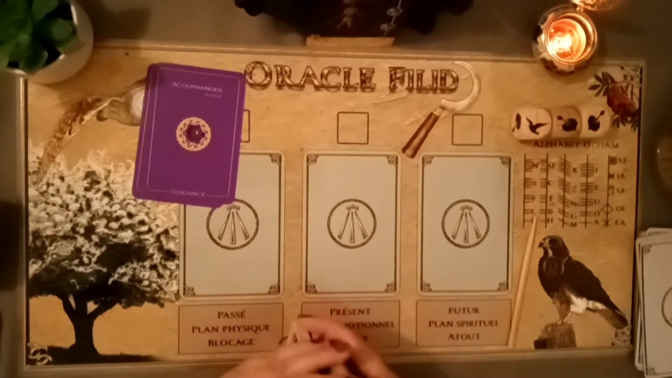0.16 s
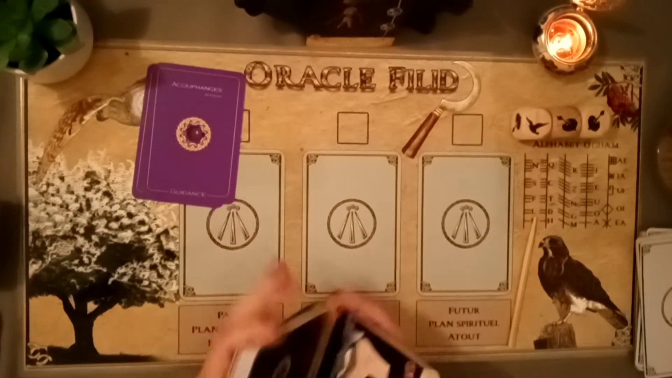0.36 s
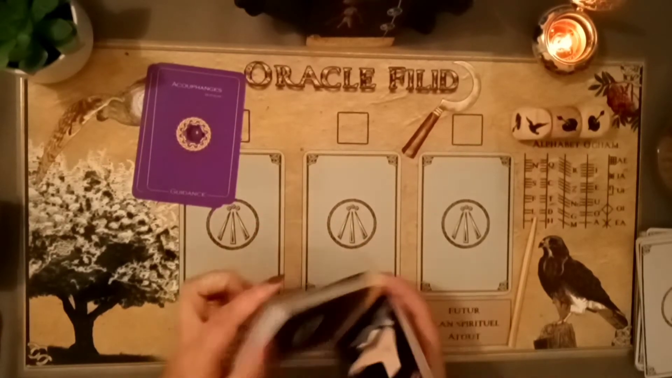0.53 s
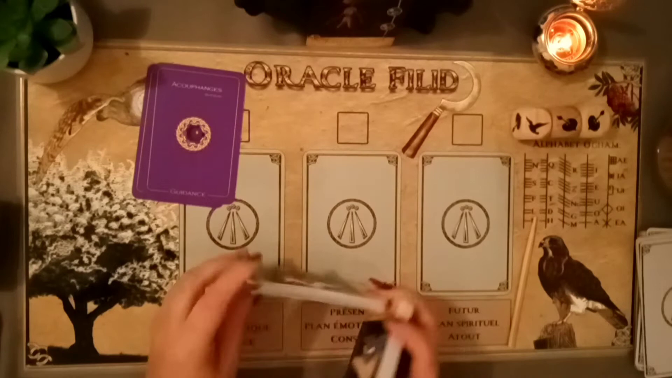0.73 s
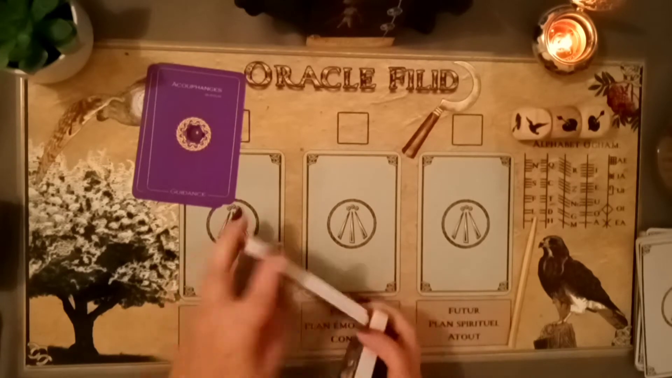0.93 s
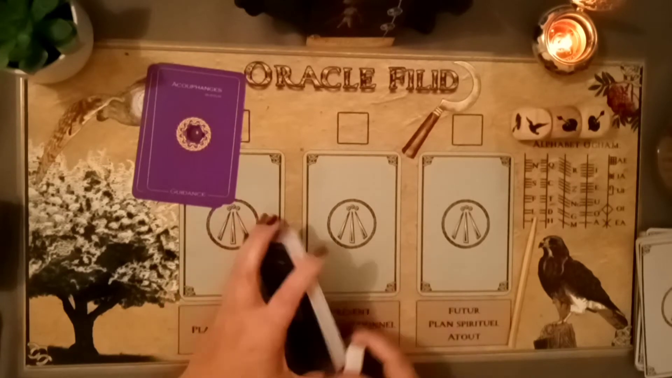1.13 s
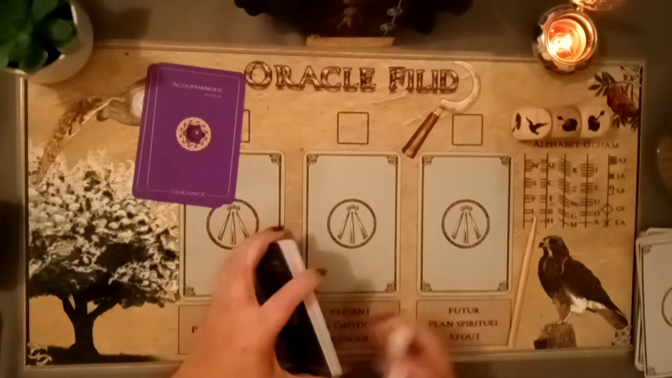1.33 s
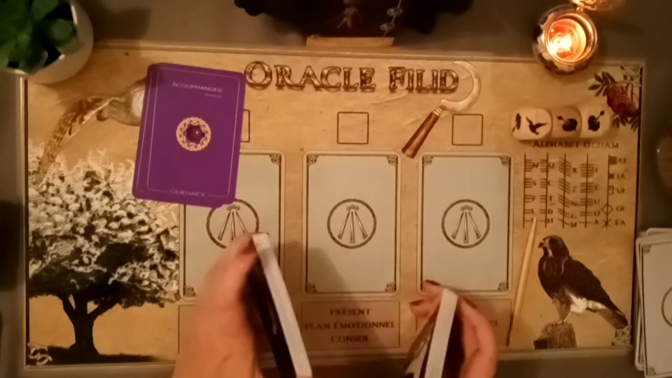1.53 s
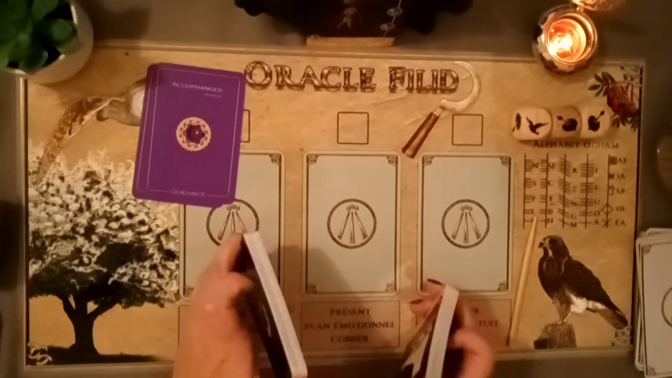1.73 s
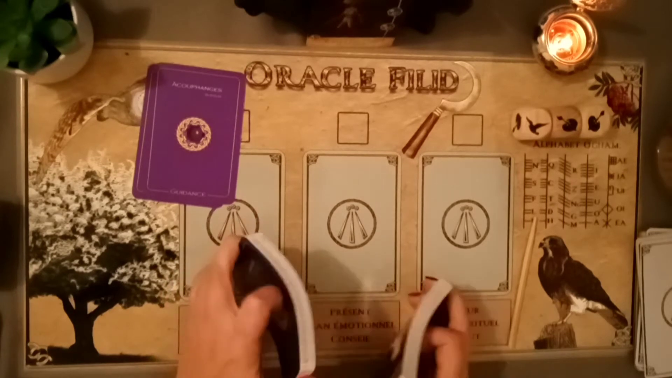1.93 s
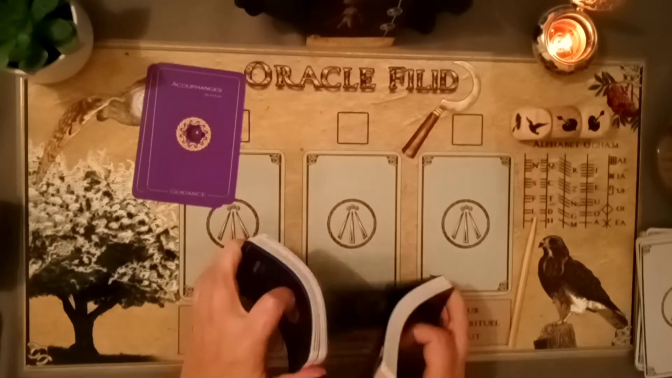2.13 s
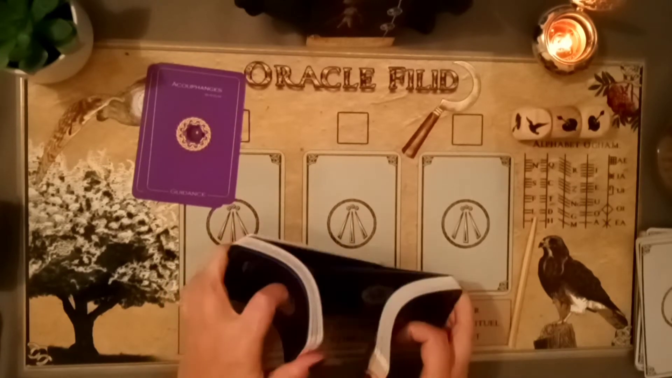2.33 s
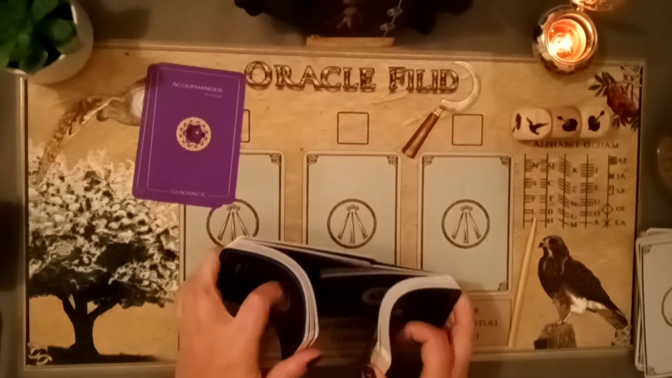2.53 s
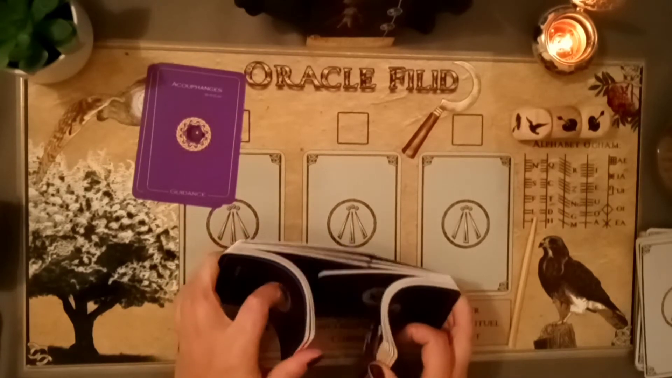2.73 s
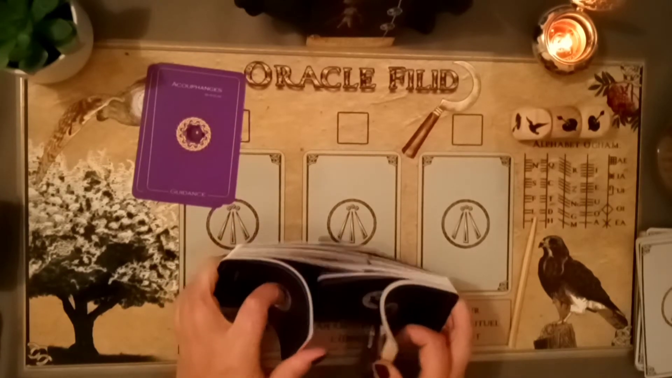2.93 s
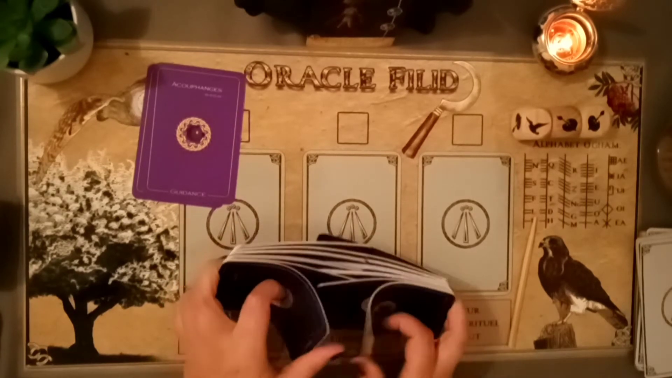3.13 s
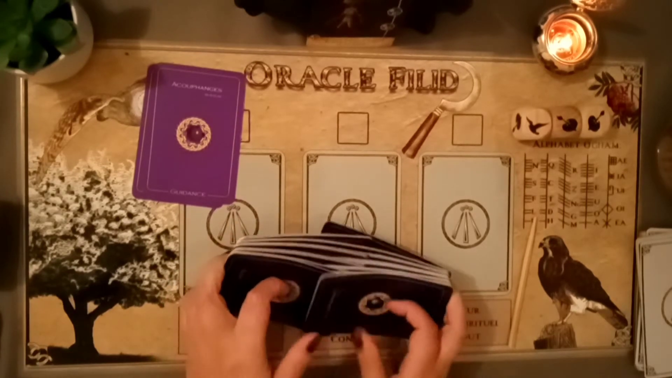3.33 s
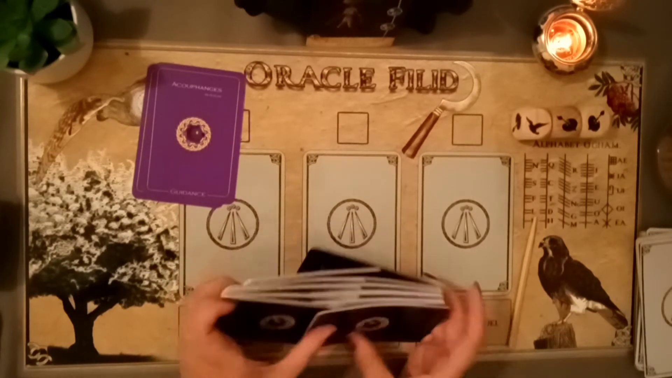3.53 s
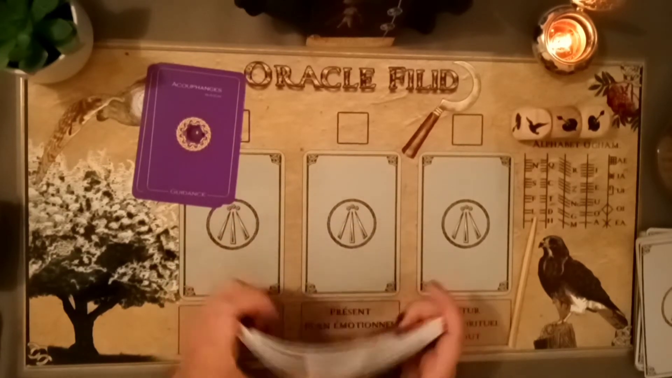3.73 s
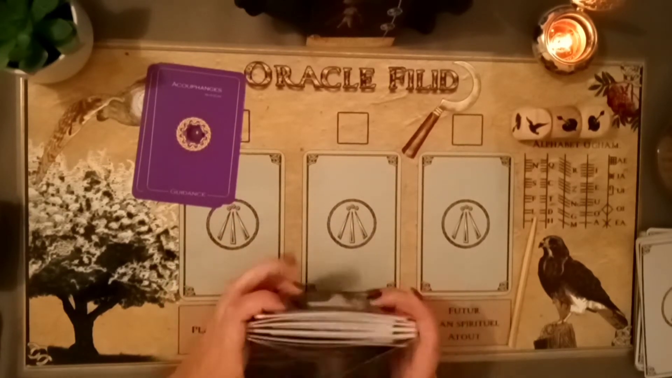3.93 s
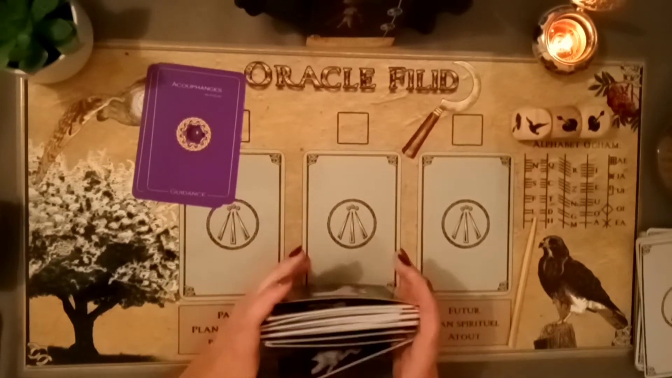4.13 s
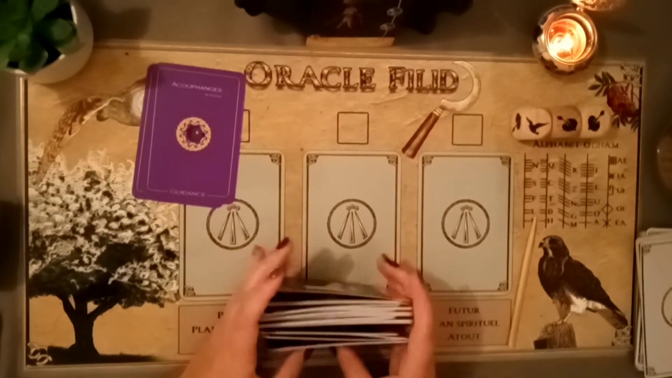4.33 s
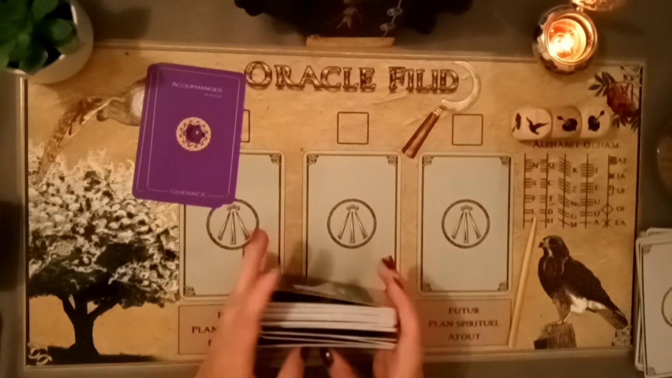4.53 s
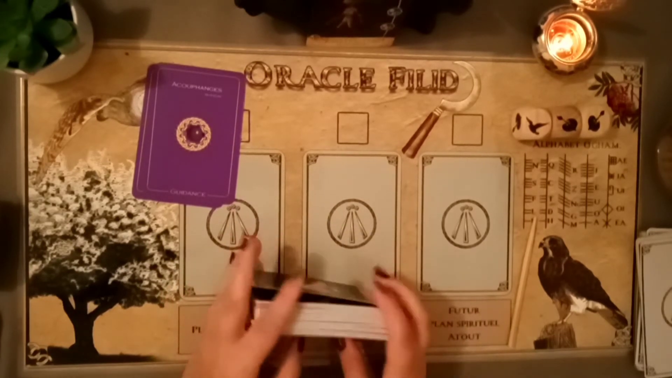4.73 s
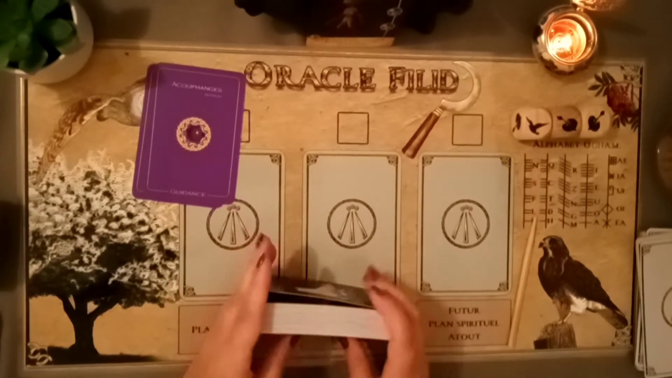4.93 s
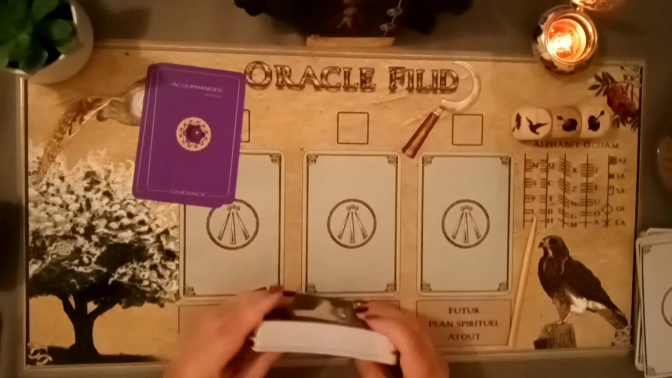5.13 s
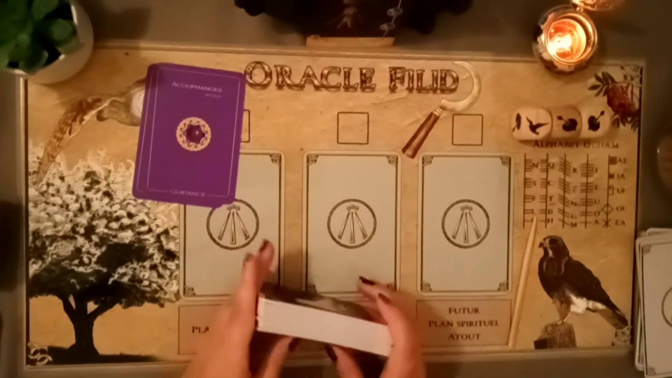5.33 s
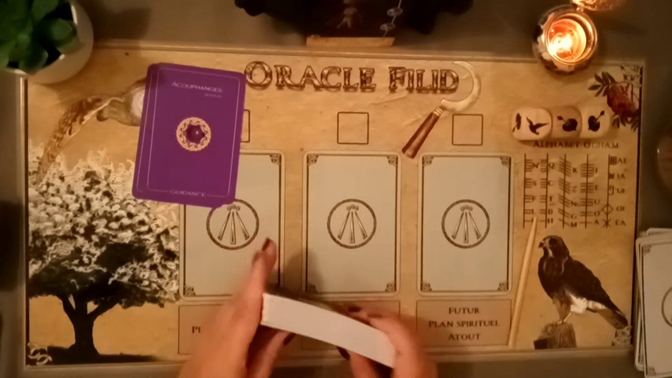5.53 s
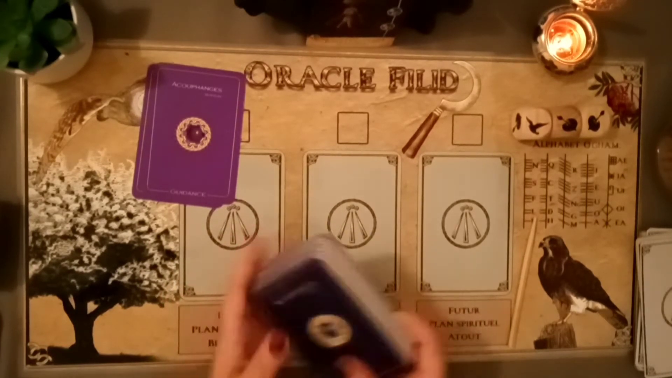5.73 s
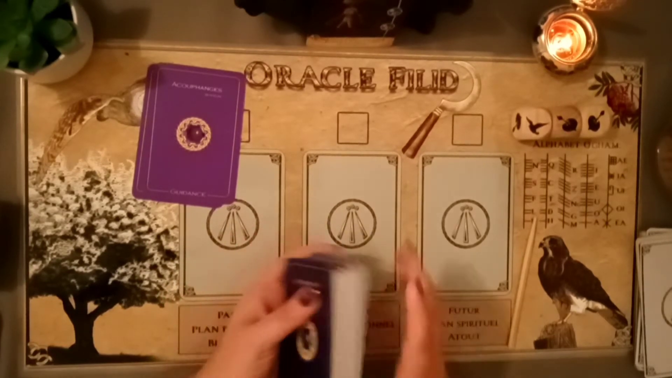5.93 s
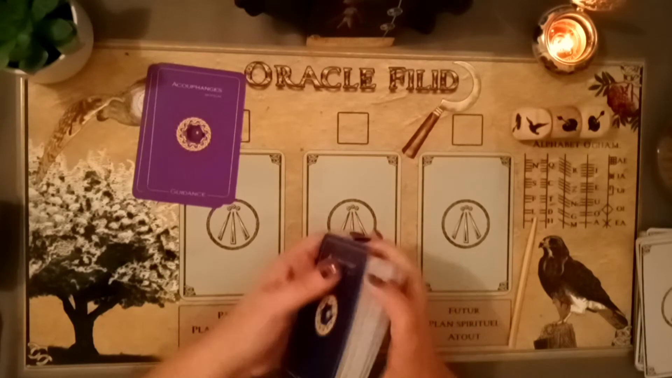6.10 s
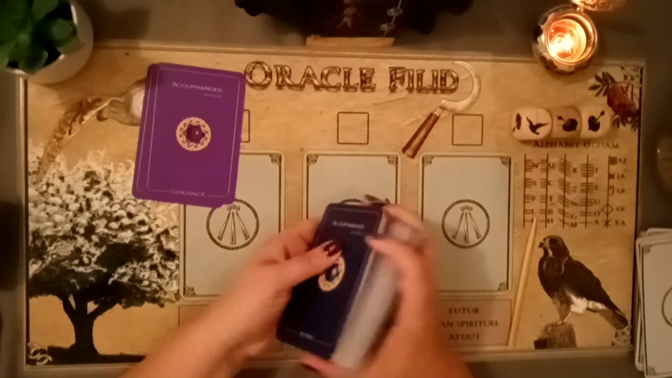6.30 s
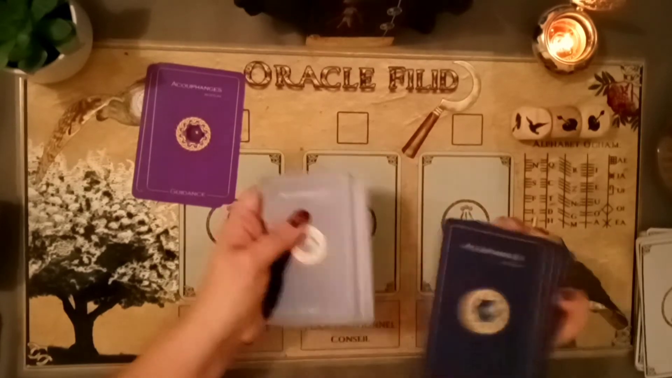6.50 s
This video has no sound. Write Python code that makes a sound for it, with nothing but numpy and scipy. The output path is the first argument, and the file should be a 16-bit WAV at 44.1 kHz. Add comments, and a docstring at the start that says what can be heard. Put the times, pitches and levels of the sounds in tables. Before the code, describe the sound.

A small live room, close stereo microphone, faint steady hiss throughout. Until 0.7 s only very faint finger rubs and tiny ticks, with a light card snap near 0.6. At 0.8 a quick double tap of the deck knocks the wooden table. Around 1.0 a soft slide, then from 1.25 to 2.1 low muffled puffs of air as packets part. At 2.2 a short burst of card snaps, another at 2.43, then a dense crisp riffle from 2.6 to 3.2, bright crackling flutter over dull thuds and a low table hum. A soft rub at 3.5. At 3.9 the bridge collapses in a brief flutter and thump. Small edge taps from 4.1 grow into hard clacks at 4.38 and 4.62. At 5.28 the heaviest knock lands, deep and woody, ringing briefly. Then quiet rubbing, low puffs from 6.1, and a light tap with a papery flick at 6.44.

```python
"""Over a faint steady hiss come first light rubs and small taps, then a deck of stiff oracle cards at work.
The deck is cut, riffled, bridged and squared over a table in a small live room, close to a stereo microphone.
Card contacts are noise bursts and grainy friction split into flex, body and edge bands; air moves in low puffs.
Knocks are dull noise thuds that ring decaying table modes, and one low table note hums under the hands.
Most of the sound also feeds a room tail built from noise that dies at its own pace in each band."""
import sys
import numpy as np
from scipy import signal
from scipy.fft import rfft, irfft, next_fast_len
from scipy.io import wavfile

SR = 44100
rng = np.random.default_rng(int(sys.argv[2]) if len(sys.argv) > 2 else 0)


def wav_out(sig):
    """Save sig, one row per channel (or a flat mono array), as 16-bit PCM at SR to the path in sys.argv[1]."""
    wavfile.write(sys.argv[1], SR, np.round(np.clip(np.atleast_2d(sig).T, -1, 1) * 32767).astype(np.int16))


N = 289296
TIME = np.arange(N) / SR   # seconds

# Steady hiss of the place. Each row: frequency in Hz, relative level in dB.
HISS_SPECTRUM = [(15, -32), (25, -6), (130, -2), (516, -18), (1610, -25.5), (2220, -25), (3250, -27),
                 (3820, -25.5), (4370, -28), (6210, -29.5), (7920, -36), (14400, -40), (16000, -51.5)]
# Tail of the small live room. Each row: frequency in Hz, 60 dB decay time in s,
# reverberant energy in dB relative to the sound sent in.
ROOM_TAIL = [(90.5, 0.6, -3), (197, 0.82, -0.5), (477, .42, -2.5), (1060, 0.41, 0), (2207, 0.33, -4),
             (4500, .37, -3.5), (8000, .33, -3), (13940, 0.21, -5.5)]
# Colour difference of the two microphone ports. Each row: frequency in Hz, left minus right in dB.
PORT_DIFFERENCE = [(60, 4), (200, 0.5), (1300, 0.5), (2400, 0.5), (4400, -0.5), (8100, -6), (10000, 2.5),
                   (12500, 14), (15000, 10)]
# Modes of the table. Each row: frequency in Hz, relative level in dB, 60 dB decay time in s.
TABLE_MODES = [(120.5, 5.5, 0.35), (156, -4, 0.15), (174, -6.5, 0.21), (254, -15, 0.15), (347, -13.5, 0.38),
               (376, -13.5, .35), (440, -15.5, 0.22), (530, -29, .25), (733, -29, 0.11),
               (892, -31.5, 0.092)]
# The table's lowest mode hums while the hands work. Each row: start in s, hold in s, rms level in dB.
TABLE_HUMS = [(2.677, 0.037, -46.5), (2.984, 0.041, -43.5), (3.099, 0.037, -39.5), (3.222, 0.053, -46),
              (3.334, 0.011, -37.5), (3.737, 0.056, -52.5), (5.516, 0.013, -41.5), (5.599, 0.013, -47.5),
              (5.714, 0.13, -42.5), (5.926, 0.087, -49), (6.106, 0.034, -54)]
# Soft low puffs as the hands move the packets through the air.
# Each row: start in s, energy in dB re 1 ms at full level, before panning.
AIR_PUFFS = [(1.44, -40.5), (1.498, -47), (1.656, -44), (1.812, -48.5), (1.975, -50.5), (2.13, -46),
             (4.055, -42.5), (5.019, -44.5), (6.133, -37), (6.296, -45), (6.489, -34.5)]
# Light rubs of fingers and packets. Each row: start in s, length in s, level in dB, resonance in Hz,
# body in dB and edge in dB, both relative to the flex.
LIGHT_RUBS = [(0.139, 0.078, -77, 1500, -27, 0.5), (0.315, .15, -82, 4000, -14, -1.5),
              (0.998, 0.18, -61, 4400, -25, -14.5), (3.459, 0.14, -62.5, 3000, -23, -9),
              (4.071, 0.082, -70, 5000, -12, -0.5), (4.978, 0.082, -68, 3490, -8, -6),
              (5.768, 0.064, -72.5, 4980, -1.5, -3.5), (5.85, 0.048, -71.5, 4480, -2, 1.5),
              (6.276, 0.14, -73.5, 1720, -2, -10), (6.348, 0.097, -62, 1610, -4.5, -4.5)]
# Faces slide through the riffle, the bridge and the squaring.
# Each row: start in s, hold in s, level in dB (both channels' power summed), edge in dB relative to the flex.
FACE_SLIDES = [(2.2, .01, -56, -7), (2.4, 0.054, -48.5, -12.5), (2.6, 0.36, -53, -7.5),
               (2.97, 0.22, -40.5, -6.5), (3.815, 0.035, -46, 1.5), (3.89, 0.054, -56, -7.5),
               (4.4, 0.011, -52, -7), (4.66, 0.0085, -52, -33)]
# Runs of cards let go in quick succession.
# Each row: start in s, length in s, level in dB, edge in dB relative to the flex.
CARD_RUNS = [(2.212, 0.036, -39.5, -11.5), (2.428, 0.052, -48, -6), (2.619, 0.057, -34, -15),
             (2.86, 0.094, -29.5, -13.5), (2.943, 0.041, -36.5, -24), (3.056, .095, -36, -21),
             (3.176, 0.057, -40.5, -6), (3.899, 0.086, -39.5, -14), (4.364, 0.037, -37.5, -16),
             (4.623, 0.059, -40.5, -10.5)]
# The deck or a packet lands on the table.
# Each row: start in s, energy in dB re 1 ms at full level (both channels summed), brightness in Hz.
TABLE_KNOCKS = [(.783, -24.5, 523), (.812, -32, 318), (2.212, -25, 644), (2.445, -26.5, 740),
                (2.617, -29, 560), (2.66, -27, 480), (2.748, -28, 570), (2.857, -34, 804),
                (2.925, -27, 585), (2.963, -29.5, 598), (3.046, -29, 526), (3.093, -24.5, 600),
                (3.191, -28, 412), (3.875, -32, 820), (3.903, -22, 1420), (3.965, -36, 754),
                (4.104, -37.5, 356), (4.37, -29, 520), (4.389, -26.5, 577), (4.616, -26.5, 670),
                (4.671, -31.5, 490), (5.281, -13, 430), (5.2899, -17.5, 800), (5.322, -18.5, 555),
                (6.126, -49, 350), (6.445, -33.5, 857)]
# The packet's edge taps a finger or the table. Each row: start in s, energy in dB re 1 ms before placing,
# flex resonance in Hz, body in dB relative to the flex, decay time constant in s.
EDGE_TAPS = [(0.184, -48, 1950, -25, .0057), (0.187, -54.5, 1500, -20, 0.004),
             (.4358, -55, 1610, -4, 0.0091), (0.777, -30, 2500, -13, 0.004), (0.806, -25, 2910, -22, 0.012),
             (0.811, -21, 2520, -28, 0.0016), (0.939, -48, 3240, 4, 0.0044),
             (0.9495, -41.5, 2700, -5, 0.0011), (3.5181, -41, 1604, -22.5, .007),
             (3.5269, -44, 3080, -10, 0.0016), (4.0985, -43, 2860, -23, .0015),
             (4.109, -38, 2340, -15.5, 0.0043), (4.182, -38, 3080, -24.5, 0.003),
             (4.1999, -38.5, 2900, -17, 0.0055), (4.205, -40.5, 2330, -17, .002),
             (4.316, -40.5, 2930, -21, 0.0051), (4.3452, -35, 3060, -8, 0.0045),
             (4.369, -37, 4150, -25, 0.0052), (4.3734, -24, 3570, -30, 0.0018),
             (4.3807, -23.5, 3850, -11.5, 0.0017), (4.3833, -18, 2970, -12.5, .002),
             (4.57, -25.5, 3240, -11, 0.0089), (4.614, -14, 3120, -25, 0.001),
             (4.6171, -18.5, 2600, -23, 0.0015), (4.6707, -21.5, 2590, -7, 0.0022),
             (4.948, -52, 1278, -7, 0.002), (5.2772, -29.5, 3170, -21, 0.0027),
             (5.288, -14.5, 2870, -8, 0.003), (6.4433, -29.5, 1610, -1.5, .002)]
# Single cards spring off the thumb. Each row: start in s, energy in dB re 1 ms before placing,
# flex resonance in Hz, edge in dB relative to the flex.
CARD_SNAPS = [(0.5801, -34, 1670, -8.5), (2.175, -40, 3040, -8), (2.1886, -29, 5880, -12.5),
              (2.201, -29, 2304, -12), (2.2118, -19.5, 1360, -17), (2.2217, -20, 1700, -19),
              (2.2905, -34, 2360, -8.5), (2.3655, -28, 1690, -4.5), (2.4262, -21.5, 2640, -15.5),
              (2.4437, -19.5, 1390, -16.5), (2.4737, -28.5, 5500, -6), (2.522, -34.5, 5100, -20),
              (2.572, -36.5, 6130, -15.5), (2.6155, -11, 5180, -19.5), (2.6192, -15.5, 2580, -16.5),
              (2.648, -19.5, 2350, -3), (2.746, -24.5, 2920, -21), (2.763, -35, 4700, -11),
              (2.8191, -32.5, 3970, -9), (2.8554, -15.5, 5830, -10), (2.857, -11, 4100, -21),
              (2.8776, -13, 3860, -11), (2.9234, -26.5, 1900, -9), (2.9299, -24, 3900, -4.5),
              (2.9663, -20.5, 5600, -12), (3.032, -35.5, 3780, -19.5), (3.0474, -11.5, 4170, -27),
              (3.07, -31.5, 1890, -4), (3.0896, -15, 1850, -11.5), (3.1061, -17.5, 4300, -4.5),
              (3.11, -27, 2300, -2), (3.1738, -17, 4340, -7), (3.1833, -21.5, 5860, -4),
              (3.3094, -32, 6070, -10.5), (3.8739, -24, 1480, -8.5), (3.885, -22.5, 6660, -9),
              (3.9032, -15, 1490, -11), (3.915, -20, 2320, -10.5), (3.963, -31, 1700, -14),
              (6.0664, -42, 5830, 6), (6.43, -36.5, 7160, 10), (6.4424, -30.5, 4000, -7.5)]
# Spectrum of a flexing card. Each row: frequency in Hz, relative level in dB.
FLEX_SPECTRUM = [(1200, 2.5), (1700, 0), (2500, 1), (4000, 2.5), (4700, 0.5), (5800, -1.5), (7000, -5.5),
                 (8000, -16)]
# Spectrum of the sizzle at a card's edge. Each row: frequency in Hz, relative level in dB.
EDGE_SPECTRUM = [(6500, 4.5), (8500, -7), (12000, -7.5), (16000, -12.5)]

HISS_DB = -66.5   # rms before the final rounding and top cut
CUTOFF_HZ = 15600
HUM_RISE_DB_PER_S, HUM_FALL_DB_PER_S = 700, 329.5
PUFF_HZ, PUFF_DECAY_S = 151, 0.0076   # upper band limit, decay time constant
# a flurry of puffs as the halves are pulled apart; the level is varied from puff to puff
DRAUGHT_S, DRAUGHT_LENGTH_S = 1.243, .165
DRAUGHT_DB, DRAUGHT_HZ, DRAUGHT_DECAY_S = -38, 250, 0.016
RUB_WIDTH = 0.74   # width of a rub's resonance as a share of its frequency
SLIDE_RISE_DB_PER_S, SLIDE_FALL_DB_PER_S = 331, 248.5
THUD_DECAY_S, THUD_SHORTENS = .018, 0.59   # at 450 Hz; brighter is shorter by this power of its brightness
THUD_OCTAVES = 1.7   # a thud reaches this far below its brightness
RING_DB, RING_DB_PER_OCTAVE = -11, -11.5   # re a knock at 450 Hz; brighter, lighter contacts move the table less
TAP_EDGE_DB, TAP_EDGE_GROWS = -24, 0.19   # sizzle of a -25 dB tap; dB more for each dB harder
TAP_RING_DB, TAP_RING_FALLS = 10, 0.19   # resonance of a -25 dB tap; dB less for each dB harder
TAP_WIDTH_HZ, TAP_ROOM_DB = 510, 0.5   # width of that resonance; room send
SNAP_DECAY_S, SNAP_SHORTENS = .0026, 0.092   # scatter after a -25 dB snap; dB shorter for each dB harder
SNAP_RING_DB, SNAP_WIDTH_HZ, SNAP_ROOM_DB = 6.5, 360, -0.5   # flex resonance, its width; room send
BODY_DB, BODY_DB_PER_OCTAVE = -11, -6   # air pushed by flex at 2.5 kHz; stiffer, higher flexes push less


def from_db(db):
    """Decibels to gain."""
    return 10 ** (np.asarray(db) / 20)


def at_hz(points, hz, axis=1):
    """Reads a table on a log-frequency axis."""
    points = np.array(points)
    return np.interp(np.log(np.maximum(hz, 1)), np.log(points[:, 0]), points[:, axis])


def rms_one(x):
    """Scales each channel to rms 1."""
    return x / np.sqrt(np.mean(x ** 2, axis=-1, keepdims=True) + 1e-20)


def one_ms(x):
    """Scales each channel to the energy of one millisecond at full level."""
    return rms_one(x) * np.sqrt(SR / 1000 / x.shape[-1])


def band(x, low_hz, high_hz, order=2):
    """Butterworth band-pass."""
    limits = [low_hz, min(high_hz, .45 * SR)]
    return signal.sosfilt(signal.butter(order, limits, "band", fs=SR, output="sos"), x)


def colour(x, points):
    """Causal (minimum-phase) filter that follows a table of frequency in Hz and level in dB."""
    size = 2 * next_fast_len(x.shape[-1] // 2 + 512, True)
    gain = from_db(at_hz(points, np.fft.rfftfreq(size, 1 / SR)))
    cepstrum = irfft(np.log(gain))
    cepstrum[1:size // 2] *= 2   # folding the cepstrum makes the phase minimal
    cepstrum[size // 2 + 1:] = 0
    return irfft(rfft(x, size) * np.exp(rfft(cepstrum)))[..., :x.shape[-1]]


def resonance(x, hz, width_hz):
    """One two-pole resonance with gain about 1 at its top."""
    r = np.exp(-np.pi * width_hz / SR)
    feedback = [1, -2 * r * np.cos(2 * np.pi * hz / SR), r * r]
    return signal.lfilter(np.array([1, 0, -1]) * (1 - r * r) / 2, feedback, x)


def pair(size, alike):
    """Two noises with a given correlation."""
    mid, side = rng.standard_normal((2, size))
    alike = np.clip(alike, 0, 1)
    return np.sqrt((1 + alike) / 2) * mid + np.sqrt((1 - alike) / 2) * side * [[1], [-1]]


def add(out, s, sound):
    """Mixes a sound in at a time in seconds."""
    at = int(np.clip(round(s * SR), 0, N - 1))
    out[:, at:at + sound.shape[-1]] += sound[:, :N - at]


def pan(db):
    """Gains of left and right that differ by this many dB."""
    return from_db(.5 * db * np.array([[1], [-1]]))


def swell(start, hold, rise_db_per_s, fall_db_per_s):
    """Gain that rises to 1, holds and dies away, straight in dB."""
    early = rise_db_per_s * np.maximum(start - TIME, 0)
    late = fall_db_per_s * np.maximum(TIME - start - hold, 0)
    return from_db(-np.minimum(early + late, 120))


def burst(decay, alike, crack, size):
    """A sharp first contact and the dying scatter that follows it."""
    x = pair(size, alike) * np.exp(-np.arange(size) / SR / max(decay, 1e-4))
    x[:, 0] += crack
    return x


def grains(size, per_s, spread_db, hiss):
    """Tiny contacts of uneven size over smooth friction."""
    born = rng.random(size) < per_s / SR
    sizes = born * from_db(spread_db * np.minimum(rng.exponential(1, size), 3))
    # each contact dies with a time constant of 0.36 ms
    grip = signal.lfilter([1], [1, -np.exp(-1 / (0.00036 * SR))], sizes + 1e-18)
    return pair(size, alike=0.22) * (rms_one(grip) + hiss)


def card(force, body_db, edge_db, ring_hz, ring_db, ring_width_hz=450):
    """A driven card: it flexes in the upper mids, pushes air lower down and sizzles at its edge."""
    flex = colour(band(force, 1450, 7600, order=3), FLEX_SPECTRUM)
    flex = rms_one(flex + from_db(ring_db) * resonance(flex, ring_hz, ring_width_hz))
    body = rms_one(band(force, 520, 1300))
    edge = rms_one(colour(band(force, 7400, 17000, order=3), EDGE_SPECTRUM))
    # the body is subtracted so that it fills in, not cancels, where its filter meets the flex filter
    return flex - from_db(body_db) * body + from_db(edge_db) * edge


def click(level_db, hz, body_db, edge_db, ring_db, width_hz, decay, spread_s=.0016):
    """One card contact: left and right direct sound, then what goes out into the room."""
    towards = burst(decay, alike=0.53, crack=1.2, size=1400)
    # other directions arrive spread out in time
    around = burst(decay + spread_s, alike=0, crack=0, size=1400)[:1]
    force = np.vstack([towards, around])
    return from_db(level_db) * one_ms(card(force, body_db, edge_db, hz, ring_db, width_hz))


def hiss_floor():
    """The faint steady hiss: coloured noise, partly shared by the two channels."""
    return from_db(HISS_DB) * rms_one(colour(pair(N, alike=0.24), HISS_SPECTRUM))


def room(x, build_s=0.001, gap_s=0.0013):
    """Uneven early reflections thicken into a tail that dies band by band."""
    t = TIME[:int(.8 * SR)]
    edges = np.geomspace(60, 17000, 15)   # Hz
    onset = 1 - np.exp(-np.maximum(t - gap_s, 0) / build_s)
    lumps = from_db(3 * np.exp(-t / .04) * rng.standard_normal(len(t)))   # the unevenness fades
    white = [pair(len(t), alike=0.045) * lumps for _ in range(2)]
    response = 0
    for k, (low, high) in enumerate(zip(edges, edges[1:])):
        hz = np.sqrt(low * high)
        noise = white[k % 2]
        shared = 1 / (1 + (hz / 450) ** 2)   # long waves reach both ports alike
        blend = shared * noise[0] + (1 - shared) * noise
        dying = from_db(-60 * t / at_hz(ROOM_TAIL, hz))
        tail = rms_one(band(blend * onset * dying, low, high, order=3))
        share = np.sqrt(2 * (high - low) / SR / len(t))   # the band's part of the whole spectrum
        response = response + from_db(at_hz(ROOM_TAIL, hz, axis=2)) * tail * share
    return signal.fftconvolve(x[:1], response, axes=1)[:, :N]


def boom(hz=123.0, wander=0.15):
    """The lowest table mode keeps humming, its phase drifting, while the hands press and shift."""
    gain = sum(from_db(db) * swell(s, hold, HUM_RISE_DB_PER_S, HUM_FALL_DB_PER_S) for s, hold, db in TABLE_HUMS)
    drift = np.interp(TIME, np.linspace(0, TIME[-1], 50), rng.standard_normal(50))
    return gain * np.sqrt(2) * np.sin(2 * np.pi * hz * TIME + wander * drift)


def puff(level_db, hz, decay):
    """One soft push of air: a low-band noise burst."""
    push = burst(decay, alike=0.24, crack=5.7, size=5000)
    return from_db(level_db) * one_ms(band(push, 44, hz, order=3))


def puffs(pan_db=9, count=7):
    """Moving air touches mostly the left port and never reaches the room."""
    out = np.zeros((2, N))
    for s, level_db in AIR_PUFFS:
        add(out, s, puff(level_db, PUFF_HZ, PUFF_DECAY_S))
    for k, (late, stronger) in enumerate(rng.uniform(-1.09, 1, (count, 2))):
        s = DRAUGHT_S + DRAUGHT_LENGTH_S * (k + 0.18 * late) / count
        add(out, s, puff(DRAUGHT_DB + 2 * stronger, DRAUGHT_HZ, DRAUGHT_DECAY_S))
    return out * pan(pan_db)


def rubs():
    """Short smooth friction strokes, each with its own colour."""
    out = np.zeros((2, N))
    for s, length, level_db, hz, body_db, edge_db in LIGHT_RUBS:
        size = int(length * SR)
        force = grains(size, per_s=230, spread_db=-1.5, hiss=1.4) * signal.windows.tukey(size, .35)
        stroke = card(force, body_db, edge_db, hz, ring_db=8.5, ring_width_hz=RUB_WIDTH * hz)
        add(out, s, from_db(level_db) * stroke)
    return out


def sliding(body_db=-15):
    """Card faces rub over each other with a smooth, bright hiss."""
    face_power = edge_power = 0
    for s, hold, level_db, edge_db in FACE_SLIDES:
        gain = from_db(level_db) * swell(s, hold, SLIDE_RISE_DB_PER_S, SLIDE_FALL_DB_PER_S)
        face_power = face_power + gain ** 2
        edge_power = edge_power + (gain * from_db(edge_db)) ** 2
    force = grains(N, per_s=1300, spread_db=4.0, hiss=1.1)
    edge_db = 10 * np.log10(edge_power / face_power)   # averaged by power over the slides
    faces = card(force, body_db, edge_db, 3900, ring_db=6.5, ring_width_hz=2600)
    return np.sqrt(face_power / 2) * faces


def knocks(uneven_db=2):
    """Each knock is a dull thud and rings the table's modes; heavy, dull ones last longer and ring more."""
    thuds, rings = np.zeros((2, 2, N))
    t = TIME[:SR]
    modes = np.array([from_db(db - 60 * t / t60) * np.sin(2 * np.pi * hz * t) for hz, db, t60 in TABLE_MODES])
    modes = band(modes, 95, 2300, order=4)   # its low edge removes the low thump of the abruptly started sines
    # each spot favours other modes
    strengths = from_db(uneven_db * rng.uniform(-1, 1, (len(TABLE_KNOCKS), len(TABLE_MODES))))
    for (s, level_db, hz), strength in zip(TABLE_KNOCKS, strengths):
        octaves = np.log2(hz / 450)
        decay = THUD_DECAY_S / 2 ** (THUD_SHORTENS * octaves)
        push = burst(decay, alike=.85, crack=0.5, size=6000)
        thud = band(push, hz / 2 ** max(THUD_OCTAVES, .5), hz)
        add(thuds, s, from_db(level_db) * one_ms(band(thud, 67, 1400)) / np.sqrt(2))
        ring_db = level_db + RING_DB + RING_DB_PER_OCTAVE * octaves
        add(rings, s, from_db(ring_db) * (strength @ modes)[None])
    return thuds, rings


def flutter(body_db=-18):
    """Many cards leave the thumb almost at once: short runs of dense, grainy contacts."""
    out = np.zeros((2, N))
    for s, length, level_db, edge_db in CARD_RUNS:
        size = int(length * SR)
        force = grains(size, per_s=900, spread_db=2.5, hiss=.9) * signal.windows.tukey(size, .3)
        add(out, s, from_db(level_db) * card(force, body_db, edge_db, 2300, ring_db=-22))
    return out


def taps(close_db=1.0, pan_db=-1.0):
    """The packet is tapped square: a soft touch lets the flex resonance stand out, a hard one sizzles."""
    out = np.zeros((3, N))   # left, right, room send
    for s, level_db, hz, body_db, decay in EDGE_TAPS:
        harder_db = level_db + 25
        edge_db = TAP_EDGE_DB + TAP_EDGE_GROWS * harder_db
        ring_db = TAP_RING_DB - TAP_RING_FALLS * harder_db
        add(out, s, click(level_db, hz, body_db, edge_db, ring_db, TAP_WIDTH_HZ, decay))
    return out[:2] * from_db(close_db) * pan(pan_db), out[2:] * from_db(TAP_ROOM_DB)


def snaps(close_db=1, pan_db=-1.5):
    """Single cards spring free and slap the pile, the harder the shorter; returns direct sound and room send."""
    out = np.zeros((3, N))   # left, right, room send
    for s, level_db, hz, edge_db in CARD_SNAPS:
        harder_db, octaves = level_db + 25, np.log2(hz / 2500)
        decay = SNAP_DECAY_S * from_db(-SNAP_SHORTENS * harder_db)
        body_db = BODY_DB + BODY_DB_PER_OCTAVE * octaves
        add(out, s, click(level_db, hz, body_db, edge_db, SNAP_RING_DB, SNAP_WIDTH_HZ, decay))
    return out[:2] * from_db(close_db) * pan(pan_db), out[2:] * from_db(SNAP_ROOM_DB)


def ports(x):
    """The two microphone ports differ in colour, each taking half of the difference."""
    left, right = ([(hz, sign * db / 2) for hz, db in PORT_DIFFERENCE] for sign in (1, -1))
    return np.array([colour(x[0], left), colour(x[1], right)])


def scene():
    """Cards and table, near and through the room, over the steady hiss."""
    (snapped, snaps_sent), (tapped, taps_sent) = snaps(), taps()
    rustle = flutter() + sliding() + rubs()
    thuds, rings = knocks()
    near = snapped + tapped + rustle + thuds
    near[0] = np.roll(near[0], 2)   # samples; the cards are a little nearer to the right port
    hiss = hiss_floor()
    reverberant = room(snaps_sent + taps_sent + rustle + thuds)
    return ports(near + reverberant + rings + boom()) + puffs() + hiss


def record(dry, top=0.61):
    """The sharpest peaks are rounded by a soft limit; a steep low-pass cuts the top."""
    rounded = top * np.tanh(dry / top)
    return signal.sosfilt(signal.ellip(10, .1, 80, CUTOFF_HZ, fs=SR, output="sos"), rounded)


dry = scene()
out = record(dry)
wav_out(out)
```